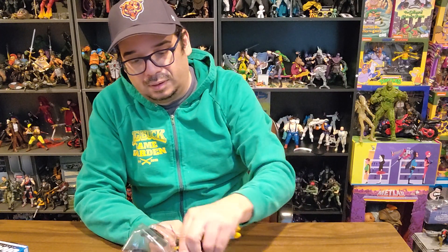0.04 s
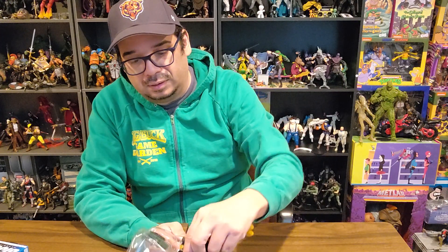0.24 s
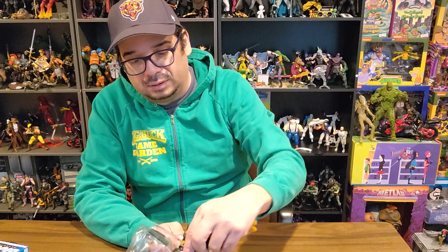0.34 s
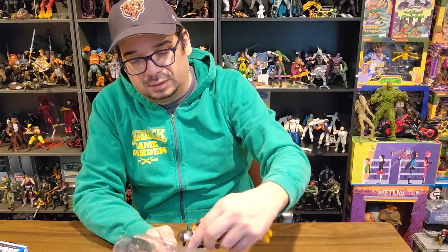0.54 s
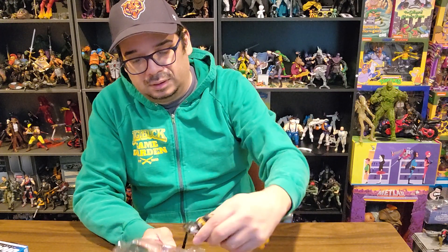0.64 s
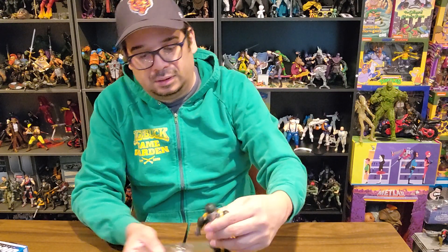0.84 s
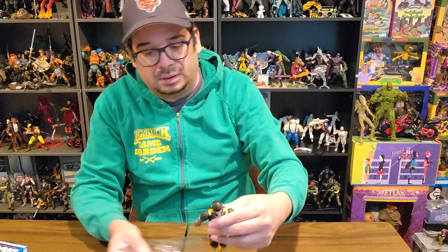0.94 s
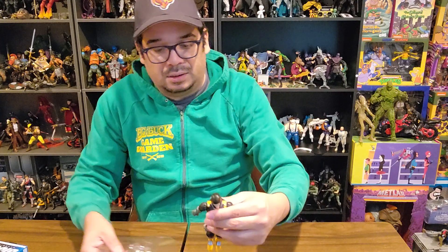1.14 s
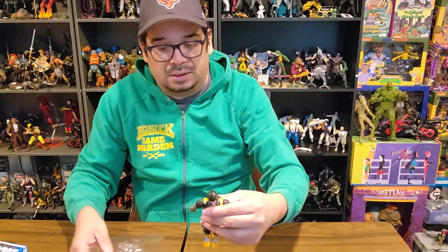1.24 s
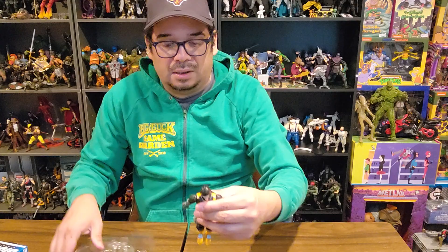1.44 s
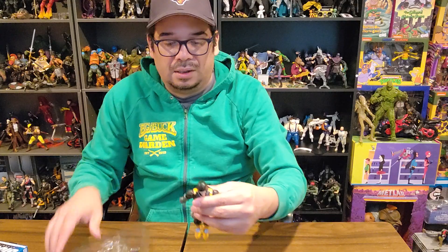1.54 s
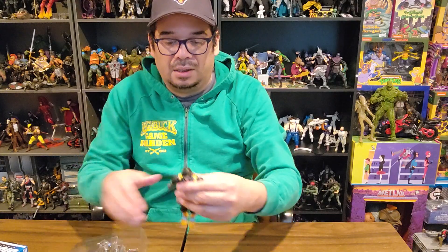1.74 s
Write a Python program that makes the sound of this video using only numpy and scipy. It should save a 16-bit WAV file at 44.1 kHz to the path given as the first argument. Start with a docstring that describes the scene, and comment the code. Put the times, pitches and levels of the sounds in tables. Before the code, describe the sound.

Thin plastic packaging creaks and pops as a small toy comes free, then is pushed aside

```python
"""In a small room, a toy is worked out of a stiff clear plastic tray on a wooden table.
The tray creaks, crackles and snaps as its facets buckle, lets go in loud cracks and ticks as it relaxes;
then it is pushed aside, scraping and knocking. Snaps, ticks and knocks are bursts of tiny slips, rubbing is
a stream of them, and creaks are slips through narrow resonances. The tray, nearby surfaces and the room
answer these sounds; soft table thuds and faint room noise lie underneath."""
import sys
import numpy as np
from scipy import signal
from scipy.fft import rfft, irfft
from scipy.io import wavfile
from scipy.ndimage import uniform_filter1d, minimum_filter1d

SR = 44100
rng = np.random.default_rng(int(sys.argv[2]) if len(sys.argv) > 2 else 0)


def transcribe(signal):
    """Save signal, clipped to [-1, 1], as a 16-bit WAV file at the path in sys.argv[1]."""
    frames = np.atleast_2d(signal).T
    limited = np.clip(frames, -1, 1)
    pcm = np.round(limited * 32767).astype(np.int16)
    wavfile.write(sys.argv[1], SR, pcm)


N = 79380  # samples in the scene, 1.8 s

# Colours are plain tone shapes. Source levels are those before the tray, echoes and room answer.
# steady room noise colour: pitch_hz, level_db
ROOM_TONE_COLOUR = [(60, -3.5), (140, -13), (5000, -21.5), (15000, -45.5)]
ROOM_TONE_DB = -72
# hands thud on the table: start_s, level_db (before the mode levels)
THUDS = [(0.527, -37), (1.198, -54.5), (1.486, -40), (1.613, -55)]
# low modes of the table top: pitch_hz, level_db
TABLE_MODES = [(58, -1.5), (78, 1.5), (115, -0.5), (198, 2.5)]
THUD_RISE_S, TABLE_T60_S = 0.0062, 0.17  # T60: time to fade by 60 dB

# the tray slides over the table: time_s, level_db
SLIDE_LEVEL = [(1.16, -48), (1.205, -45.5), (1.235, -49), (1.262, -40), (1.41, -47.5), (1.46, -40.5),
               (1.55, -36.5), (1.575, -53.5), (1.615, -43), (1.70, -42.5), (1.745, -57.5), (1.8, -68)]
# colour of the sliding: pitch_hz, level_db
SLIDE_COLOUR = [(100, -21.5), (230, -6), (400, -13.5), (680, 0.5), (1050, -3.5), (1450, -3), (2400, -10.5),
                (4800, -16.5), (8000, -30.5), (16000, -46)]
SLIDE_SCATTER_DB = 3  # the sliding tray catches unevenly
PUSHED_LAG_S = 0.00008  # sliding and knocks come late on the left, rounded to whole samples

# the toy rubs inside the tray: time_s, level_db
RUB_LEVEL = [(0, -54.5), (.1, -50), (.16, -41.5), (.21, -44.5), (.3, -45.5), (.358, -41), (.38, -27),
             (.43, -42), (.52, -28.5), (.57, -60), (.67, -56.5), (.745, -46.5), (.8, -90)]
# colour of the rubbing: pitch_hz, level_db
RUB_COLOUR = [(100, -18.5), (500, -0.5), (1150, -1), (1600, -0.5), (2700, -11), (5300, -17), (16000, -59.5)]
SLIPS_PER_S, SLIP_DECAY_MS, RUB_SPREAD = 1100, 1.34, 0.32
# colour of strained creases crackling: pitch_hz, level_db
CRACKLE_COLOUR = [(800, -24.5), (5000, 12), (15000, -15.5)]
CRACKLES_PER_S, CRACKLE_SCATTER_DB = 170, 7
CRACKLE_DB = -10  # relative to the rubbing
WANDER_DB, WANDER_PER_S = 4, 45  # how far and how often a scrape's colour shifts as the contact moves

# an edge creaks: start_s, end_s, resonance_hz, level_db (before the overtone and swell)
CREAKS = [(0.143, 0.184, 1467, -47.5), (0.371, 0.414, 621, -36.5), (0.387, 0.474, 1269, -35),
          (1.275, 1.418, 1458, -46)]
CREAK_WIDTH_HZ, CREAK_RISE_OCT, OVERTONE_RATIO, OVERTONE_DB = 260, 0.1, 1.8, -8

# the tray knocks on the table: start_s, ring_hz, then level_db at the first three COLOUR_HZ
KNOCKS = [ (1.191, 1373, 5, 5.5, -3.5), (1.2442, 610, -4.5, -4, -10.5), (1.4278, 1980, 7, 7.5, -13),
          (1.480, 725, 7, -8, -7.5), (1.489, 650, 6.5, 15, -14.5), (1.608, 723, 1.5, 3.5, -15),
          (1.654, 1370, 1.5, -2.5, -27)]
# single creases flip: start_s, ring_hz, click_db (added to the colour), ring_db over the click
TICKS = [ (0.0171, 1460, -23, 18.5), (.137, 1540, -22.5, 26), (.287, 1620, -8.5, 12),
         (0.7025, 1940, -20, 9.5), (0.7277, 1490, -11, 11), (0.7877, 2770, -25, 23.5),
         (0.7891, 1700, -21.5, 22), (.850, 1065, -19.5, 4), (1.042, 2105, -18.5, 9),
         (1.0672, 1595, -15.5, 11), (1.5927, 1480, -23, 22), (1.692, 3140, -28, 17)]
# colour of a tick: pitch_hz, level_db
TICK_COLOUR = [(100, -25.5), (800, 6), (5500, -3.5), (12000, -26.5)]
# facets buckle: start_s, ring_hz, then level_db at each of COLOUR_HZ
SNAPS = [ (.1912, 1520, -2.5, -9, -5, -14.5), (.2275, 1563, -7.5, 13, 9, -3),
         (.3675, 1740, 0.5, 5.5, 3, -14), (.4383, 1440, -6, -3.5, 4.5, -0.5),
         (.4843, 2130, 13.5, 14.5, 12.5, 1), (.5254, 1327, 16, 12.5, 20.5, 14.5),
         (.5292, 2160, 21.5, 14, 18.5, 2.5), (.5318, 1576, 15, 18, 19, 0.5),
         (.9587, 2094, -35.5, -23.5, -24, -30.5), (1.2758, 6960, -2.5, -2.5, -3.5, -20)]
# where the snap and knock levels apply: pitch_hz
COLOUR_HZ = (600, 1700, 5000, 12000)
KNOCK_DECAY_MS, TICK_DECAY_MS, SNAP_DECAY_MS = 5.5, 2.3, 3.06
BASS_DB_PER_OCT, AIR_DB_PER_OCT = -7, -14.5  # fall below and above the listed pitches
FACET_DB, FACET_OCT = 10, 0.29  # resonance height, and distance from its peak to half that height
BUCKLES_PER_S, SHEET_SHARE = 4000, 0.46  # tiny slips in a burst; sheet vibration mixed with them
BURST_RISE = 0.15  # build-up time as a share of the decay time
CLICK_SPREAD = 0.75  # how unlike the two channels are in the treble

# ringing of the whole tray: pitch_hz, level_db over the direct sound
TRAY_MODES = [(378, -1.5), (615, 4), (714, -7.5), (1335, -16), (1608, -6), (2300, -3), (4190, -6)]
TRAY_T60_S = 0.085
# early reflections from table and ceiling: delay_s, level_db
ECHOES = [(.006, -11.5), (.0185, -20)]
ECHO_TOP_HZ = 5100
ROOM_DB, ROOM_T60_S, ROOM_TREBLE_T60_S, ROOM_DELAY_S, ROOM_RISE_S = -7, 0.16, 0.12, 0.0032, 0.0027
ROOM_SPREAD, SPREAD_HZ = 1, 3000  # the channels differ mostly above SPREAD_HZ
LIMIT, LIMIT_S, TOP_HZ = 0.92, 0.002, 15900  # peak limit, limiter window, top of the sound


def undb(db):
    """Turn decibels into a plain multiplier."""
    return 10 ** (np.asarray(db) / 20)


def level(x):
    """Scale to unit rms, a steady measure of strength."""
    return x / np.sqrt(np.mean(x ** 2) + 1e-20)


def response(points, ring_hz=1000, ring_db=0):
    """Make a filter from a colour and one optional resonance, with no sound before its start."""
    hz, db = np.array(points, float).T
    octave = np.log2(np.maximum(np.fft.rfftfreq(4096, 1 / SR), 1))
    distance = (octave - np.log2(ring_hz)) / FACET_OCT
    resonance_db = ring_db / (1 + distance ** 2)
    gain = undb(np.interp(octave, np.log2(hz), db) + resonance_db)
    # folding the log spectrum onto positive time keeps the colour and puts the sound early
    cepstrum = irfft(np.log(gain))
    half = len(cepstrum) // 2
    fold = np.r_[1, np.full(half - 1, 2), 1, np.zeros(half - 1)]
    return irfft(np.exp(rfft(cepstrum * fold)))


def convolve(x, h):
    """Filter each channel, keeping the scene's length."""
    return signal.fftconvolve(np.atleast_2d(x), np.atleast_2d(h), axes=1)[:, :N]


def stereo(mid, side, spread):
    """Make left and right alike in the bass and partly unlike in the treble."""
    treble = signal.lfilter(*signal.butter(1, SPREAD_HZ, "high", fs=SR), side)
    side = spread * treble
    return np.array([mid + side, mid - side])


def add(out, start_s, x):
    """Mix a sound in at a time."""
    i = max(int(start_s * SR), 0)
    out[:, i:i + x.shape[-1]] += x[..., :max(N - i, 0)]


def walk():
    """A smooth random wander with a spread near 1."""
    knots = rng.standard_normal(256)
    return np.interp(np.arange(N) / SR * WANDER_PER_S, np.arange(len(knots)), knots)


def wander(x):
    """Half-octave bands swell and fade on their own as the contact moves."""
    place = 2 * np.log2(np.maximum(np.fft.rfftfreq(N, 1 / SR), 100) / 100)
    spectrum = rfft(x)
    out = np.zeros_like(x)
    for k in range(16):
        band = irfft(spectrum * np.maximum(1 - abs(place - k), 0), N)
        out += band * undb(WANDER_DB * walk())
    return out


def burst(decay_ms):
    """A fading run of tiny slips and sheet vibration, near unit energy with an even spectrum."""
    t = np.arange(2048) / SR
    happens = rng.random(len(t)) < BUCKLES_PER_S / SR
    slips = rng.standard_normal(len(t)) * happens * np.sqrt(SR / BUCKLES_PER_S)
    sheet = SHEET_SHARE * rng.standard_normal(len(t))
    age = t * 1e3 / decay_ms
    envelope = np.exp(-age) * (1 - np.exp(-age / BURST_RISE))
    spectrum = rfft((slips + sheet) * envelope)
    smooth_power = uniform_filter1d(abs(spectrum) ** 2, size=35)
    even = irfft(spectrum / np.sqrt(smooth_power + 1e-20))
    fade_out = np.minimum(2 - 2 * t / t[-1], 1) ** 2
    return even * fade_out


def clicks(table, decay_ms):
    """Each burst takes the colour and ring of the facet that moves."""
    out = np.zeros((2, N))
    for start, ring_hz, *db in table:
        bass_end = (COLOUR_HZ[0] / 8, db[0] + 3 * BASS_DB_PER_OCT)
        air_end = (COLOUR_HZ[len(db) - 1] * 4, db[-1] + 2 * AIR_DB_PER_OCT)
        colour = [bass_end, *zip(COLOUR_HZ, db), air_end]
        click = stereo(burst(decay_ms), burst(decay_ms), CLICK_SPREAD)
        add(out, start, convolve(click, response(colour, ring_hz, FACET_DB)))
    return out


def friction(curve, colour, rate, scatter_db=0):
    """Surfaces stick and slip in pulses of scattered size and shifting colour, along a level curve."""
    happens = rng.random(N) < rate / SR
    # half fast scatter, half slow wander, so large slips gather in clusters
    scatter = np.clip((rng.standard_normal(N) + walk()) / np.sqrt(2), -2, 1.5)
    sizes = happens * undb(scatter_db * scatter)
    pulses = stereo(*(sizes * rng.uniform(-0.97, 1, (2, N))), RUB_SPREAD)
    facets = rng.integers(0, 4, N)  # each slip moves one of four facets
    slips = sum(convolve(pulses * (facets == k), burst(SLIP_DECAY_MS)) for k in range(4))
    db = np.interp(np.arange(N) / SR, *np.array(curve).T, left=-120, right=-120)
    return level(wander(convolve(slips, response(colour)))) * undb(db)


def room_tone():
    """Faint steady rumble and hiss of the room, made from coloured noise."""
    noise = stereo(*rng.standard_normal((2, N)), ROOM_SPREAD)
    return undb(ROOM_TONE_DB) * level(convolve(noise, response(ROOM_TONE_COLOUR)))


def thuds():
    """Soft pushes of the hands set off the low modes of the table."""
    out, t = np.zeros((2, N)), np.arange(SR // 2) / SR
    modes = sum(undb(db) * np.sin(2 * np.pi * hz * t) for hz, db in TABLE_MODES)
    ring = modes * np.exp(-np.log(1000) * t / TABLE_T60_S)
    for start, db in THUDS:
        add(out, start, undb(db) * ring * (1 - np.exp(-t / THUD_RISE_S)))
    return out


def sliding():
    """The tray sticks and slips unevenly across the table top."""
    return friction(SLIDE_LEVEL, SLIDE_COLOUR, SLIPS_PER_S, SLIDE_SCATTER_DB)


def knocks():
    """The tray hits the table in short bursts that ring its facets."""
    return clicks(KNOCKS, KNOCK_DECAY_MS)


def pushing():
    """Sliding and knocking together, with the left channel slightly late."""
    left, right = sliding() + knocks()
    t = np.arange(N) / SR
    lag_s = round(PUSHED_LAG_S * SR) / SR
    return np.array([np.interp(t - lag_s, t, left), right])


def rubbing():
    """The toy sticks and slips against the inside of the tray."""
    return friction(RUB_LEVEL, RUB_COLOUR, SLIPS_PER_S)


def crackle():
    """Strained creases give way in sparse, uneven pulses while the toy rubs."""
    return undb(CRACKLE_DB) * friction(RUB_LEVEL, CRACKLE_COLOUR, CRACKLES_PER_S, CRACKLE_SCATTER_DB)


def creaks():
    """An edge sticks and slips; its resonance and overtone waver and rise as the strain grows."""
    out = np.zeros((2, N))
    narrow = signal.butter(2, CREAK_WIDTH_HZ / 2, fs=SR)
    for start, end, hz, db in CREAKS:
        progress = np.linspace(0, 1, int((end - start) * SR))
        happens = rng.random(len(progress)) < SLIPS_PER_S / SR
        slips = rng.choice([-1, 1], len(progress)) * happens
        waver = 0.5 * walk()[:len(progress)]
        pitch_hz = hz * 2 ** (CREAK_RISE_OCT * (progress - 0.5 + waver))
        phase = 2 * np.pi * np.cumsum(pitch_hz) / SR
        tones = []
        for ratio in (1, OVERTONE_RATIO):
            # shift the moving pitch to zero, filter narrowly, then shift it back
            turn = np.exp(1j * ratio * phase)
            tones.append(level((turn * signal.lfilter(*narrow, slips / turn)).real))
        low, high = tones
        swell = np.sqrt(np.minimum(2 * abs(np.sin(np.pi * progress)), 1))
        add(out, start, undb(db) * (low + undb(OVERTONE_DB) * high) * swell)
    return out


def ticks():
    """A single crease flips: a short click with one facet ringing through it."""
    out = np.zeros((2, N))
    for start, ring_hz, db, ring_db in TICKS:
        click = stereo(burst(TICK_DECAY_MS), burst(TICK_DECAY_MS), CLICK_SPREAD)
        add(out, start, undb(db) * convolve(click, response(TICK_COLOUR, ring_hz, ring_db)))
    return out


def snaps():
    """Facets of the tray buckle in short bursts, each with its own colour and ring."""
    return clicks(SNAPS, SNAP_DECAY_MS)


def tray(x):
    """The whole tray rings in fading modes in answer to every sound made on it."""
    t = np.arange(SR // 2) / SR
    damping = np.log(1000) / TRAY_T60_S
    modes = sum(undb(db) * np.cos(2 * np.pi * hz * t) for hz, db in TRAY_MODES)
    ring = modes * 2 * damping / SR * np.exp(-damping * t)
    return x + convolve(x, ring)


def echoes(x):
    """Table and ceiling return duller, slightly scattered copies."""
    out = x.copy()
    dull = signal.lfilter(*signal.butter(1, ECHO_TOP_HZ, fs=SR), x)
    for delay, db in ECHOES:
        add(out, delay, undb(db) * convolve(dull, burst(SLIP_DECAY_MS)))
    return out


def room(x):
    """Dense reflections from shelves and walls, as fading noise; the treble dies first."""
    t = np.arange(SR // 2) / SR
    rise = 1 - np.exp(-np.maximum(t - ROOM_DELAY_S, 0) / ROOM_RISE_S)
    low_fade = np.exp(-np.log(1000) * t / ROOM_T60_S)
    treble_fade = np.exp(-np.log(1000) * t / ROOM_TREBLE_T60_S)
    lowpass = signal.butter(2, 4000, fs=SR, output="sos")
    tails = []
    for noise in rng.standard_normal((2, len(t))):
        low = signal.sosfiltfilt(lowpass, noise)
        tail = rise * (low * low_fade + (noise - low) * treble_fade)
        tails.append(level(tail) / np.sqrt(len(t)))
    reflections = stereo(*tails, ROOM_SPREAD) / np.hypot(1, ROOM_SPREAD)
    return x + undb(ROOM_DB) * convolve(x, reflections)


def scene():
    """Pulling and pushing pass through tray, echoes and room; thuds and room noise join directly."""
    pulling = rubbing() + crackle() + creaks() + ticks() + snaps()
    handling = undb(-1.5) * (pulling + pushing())
    return room_tone() + thuds() + room(echoes(tray(handling)))


def record(dry):
    """A fast limiter holds down the loudest peaks; the extreme treble is cut."""
    size = int(LIMIT_S * SR)
    needed = LIMIT / np.maximum(abs(dry).max(axis=0), LIMIT)
    gain = uniform_filter1d(minimum_filter1d(needed, size), size)
    top_cut = signal.ellip(10, 0.2, 90, TOP_HZ, fs=SR, output="sos")
    return signal.sosfilt(top_cut, dry * gain)


dry = scene()
out = record(dry)
transcribe(out)
```